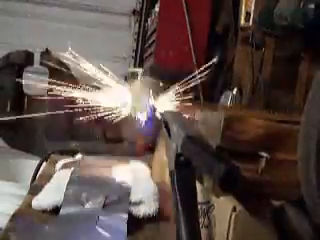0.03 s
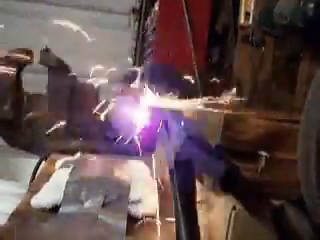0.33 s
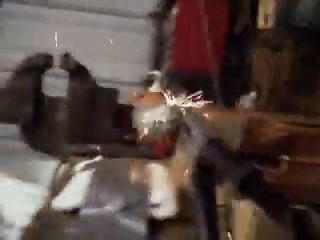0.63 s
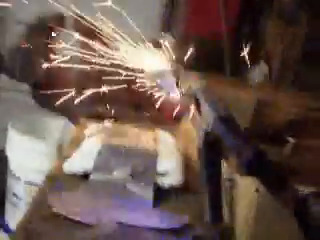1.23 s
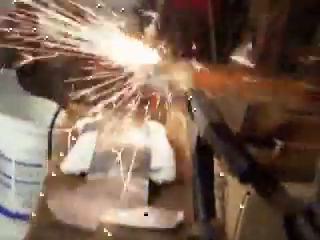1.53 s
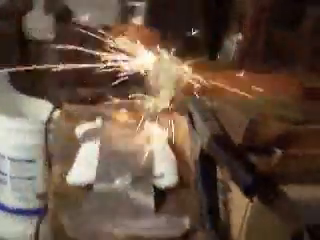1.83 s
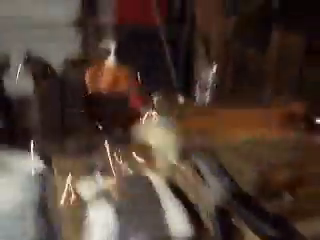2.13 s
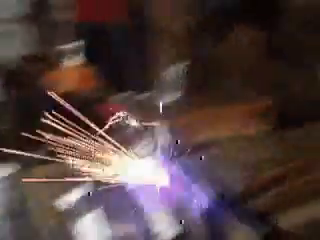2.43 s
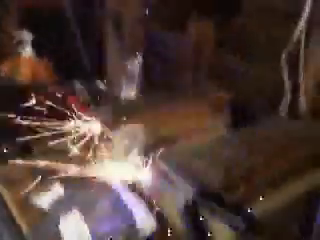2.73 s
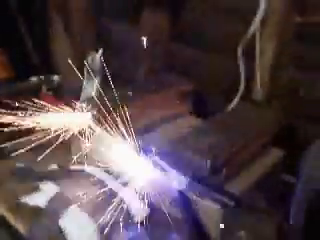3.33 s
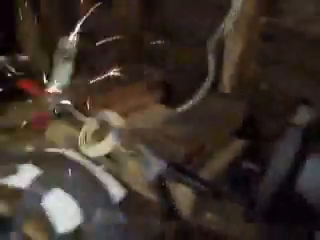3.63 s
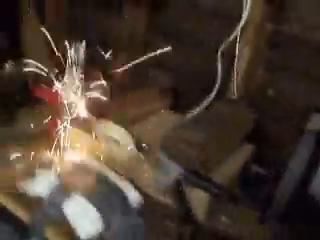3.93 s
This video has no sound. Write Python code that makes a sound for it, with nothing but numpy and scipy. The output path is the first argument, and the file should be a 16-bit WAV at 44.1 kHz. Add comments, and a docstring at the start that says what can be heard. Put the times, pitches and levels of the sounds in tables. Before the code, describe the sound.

Sharp electrical crackling sputters from a sparking motor close to the microphone, each snap ringing briefly in the workshop. Uneven clusters alternate with short lulls, over a soft sizzle, a faint electrical hum and a low rumble.

```python
"""Sputtering motor on a workshop bench

A homemade motor's contacts strike short arcs in irregular runs, each a snap with a few re-strikes
that rings the mount and the room. Molten specks sizzle between them, a few flares puff air at the
microphone, the rotor drones briefly and the supply hums over a low rumble. A small camera hears it
through a narrow band, and its held samples add a thin metallic fizz on top."""
import sys
import numpy as np
from scipy import signal
from scipy.fft import rfft, irfft
from scipy.io import wavfile
from scipy.ndimage import uniform_filter1d

SR = 44100
rng = np.random.default_rng(int(sys.argv[2]) if len(sys.argv) > 2 else 0)


def dump_mix(stems):
    """Bounce the given channels to the path in sys.argv[1] as a 16-bit WAV at rate SR."""
    frames = np.atleast_2d(stems).T  # one column per channel
    limited = np.clip(frames, -1, 1)  # hard clip at full scale
    pcm = np.round(limited * 32767).astype(np.int16)
    wavfile.write(sys.argv[1], SR, pcm)


N = 176400
T = np.arange(N) / SR
BAND_HZ = 2155   # top of the camera's narrow band
LEAD_IN_S = 0.008   # space for the leaders ahead of each snap


def contacts():
    """The motor's contacts strike arcs in irregular runs."""
    # Each row: start in seconds, relative level, bass and treble in dB, span of the re-strikes in ms.
    arcs = [(0.0752, -19.0, -0.5, -0.5, 2.84), (0.0888, -25, -6.0, -0.5, 1.54),
            (0.0979, -22, -3, 2.5, 1.66), (0.112, -20.5, -0.5, -3.5, 1.93), (0.1258, -36, -2, 5.5, 2.1),
            (0.148, -22.5, 6, 1.5, 1.17), (0.1675, -24.5, 2, -1.5, 1.5), (0.184, -29.5, 1.5, -8, 1.22),
            (0.1929, -29.5, 10, -1.5, 0.72), (0.2118, -25, 6, -5, 1), (0.3779, -13.0, -7, -11, 3.15),
            (0.3973, -26.5, -5.5, -5, 3), (0.4125, -25.0, -8.5, -3.5, 4.2), (0.4448, -30, -0.5, -2, 2.17),
            (0.4785, -30.5, 0.0, 1.0, 1.2), (0.498, -26.5, 5.5, 5, 3.2), (0.5159, -32.5, 0.5, 6, 1.5),
            (0.5304, -26.0, 5, -2.5, 1.97), (0.5488, -31.0, 3, -5, 1.28), (0.5683, -31.0, 0.5, -2.5, 1.14),
            (0.6931, -26.5, -1, 3.0, 4.4), (0.7436, -39, 6, 2, 1.7), (0.7633, -29.5, 0.5, -3.5, 1.15),
            (0.7962, -24.0, 1.0, -5, 1.7), (0.8152, -31, 2, 2.0, 2), (0.8498, -31.5, 1.5, -5, 3.6),
            (0.8669, -26.5, 5.5, 2.5, 1.54), (0.9101, -31.5, 2.5, -1.5, 4.8), (0.9249, -36, 1.5, 0, 1.73),
            (0.9328, -25.0, 4.5, 0, 1.16), (0.95, -33.0, 10.5, -6.5, 4.5), (0.9833, -39, -1.0, -1, 2.8),
            (1.0271, -28.5, 0.5, -6, 1.87), (1.0513, -42.5, 1.5, -1, 2.1), (1.1, -33.5, -1.0, 0, 0.65),
            (1.1114, -41.5, 7.5, 4.0, 2.3), (1.132, -37, 11, -11.5, 2.3), (1.1499, -30.5, 3, 0.5, 1.8),
            (1.1633, -25.5, 6, -1.0, 1.53), (1.1809, -28, 1, -2, 2.8), (1.234, -27.0, 5, 2, 2.23),
            (1.2499, -38.5, 6, -3.5, 1.2), (1.392, -36.5, 7, -1, 1.1), (1.412, -29.5, 6, 2.5, 1.6),
            (1.4784, -25.5, 2, 1.5, 1.87), (1.4934, -24, 3.5, 8, 2.33), (1.497, -24, 5, 8.5, 0.82),
            (1.5376, -36.0, 5.5, 2, 1.06), (1.5453, -23.0, 2.0, 3, 0.8), (1.5816, -33.0, -2.5, 9, 1.5),
            (1.6171, -39, -7.5, 3.5, 2.6), (1.786, -39.5, -0.5, 2, 1.7), (1.7985, -28.5, -2.0, 2.5, 1.76),
            (1.8077, -37, -3, 1, 6), (1.8359, -34.5, -0.5, 7, 1.28), (1.912, -31.5, -3.5, 5, 1.15),
            (1.9342, -40, -7, 3, 2.1), (1.9775, -43.0, 0.0, 3.5, 2.9), (1.9927, -44.5, 2, 1.5, 3.36),
            (2.009, -43.5, -4, -0.5, 2.33), (2.2764, -32.5, -7, -4, 1.38), (2.316, -43.5, 0.0, 3, 2.4),
            (2.3307, -33.5, -12.5, 1.5, 2.6), (2.3582, -41.5, 0.5, -3, 3.44),
            (2.3644, -31.5, -9, -1.5, 0.99), (2.453, -42, 3.5, 7, 2.4), (2.4643, -31.0, 2.0, -5.0, 1.6),
            (2.5673, -25.5, 2, -0.5, 1.77), (2.579, -24.5, -4.5, -3.5, 1.3), (2.6127, -32.5, 0, 2.5, 2.1),
            (2.6303, -27.0, -2.5, 0, 1.67), (2.682, -36, -2, 0, 2.8), (2.71, -34.5, -3, -3.5, 1.37),
            (2.7283, -30.5, 3, 4, 1.77), (2.7679, -38.5, 10, 1, 3.14), (3.0452, -22.5, -3, 2, 4.35),
            (3.0615, -41.5, 0, 6.5, 2.6), (3.1126, -37.5, -12.5, -2, 2.2), (3.1632, -36.0, -13, -1.0, 4),
            (3.2099, -35.5, -1.5, 2.5, 2.06), (3.2698, -39, 6.5, 6, 3.2), (3.2809, -19.5, -3, -2.5, 2.76),
            (3.3436, -32.5, -1, -5.5, 3.93), (3.3513, -33.5, -3, -4, 4.3), (3.4095, -36.5, -7.5, 8, 2.6),
            (3.5149, -21.5, -5.5, -4, 3.4), (3.5307, -28.5, -6, -8, 2.02), (3.5667, -32.5, -10, -4.5, 4.4),
            (3.6146, -32.5, -1.5, 2.5, 2.75), (3.632, -33.0, -3, 2, 3.95), (3.7675, -35, 1.5, -5.5, 4.75),
            (3.7753, -39, -4, -2, 5.1), (3.7841, -40, -3, -1, 2.5), (3.8443, -25, -4.5, 2.5, 1.97),
            (3.8673, -35.0, 7.5, -0.5, 3.4), (3.8801, -32.0, 3, 3.5, 2)]
    out = np.zeros(N)
    for start, *shape in arcs:
        add(out, start - LEAD_IN_S, arc(*shape))
    return out


def arc(db, bass_db, treble_db, length_ms, size=4096):
    """The gap spits leaders, for longer in a long arc, then breaks down with a snap and re-strikes."""
    # Each row: frequency in Hz, relative level of the snap there in dB.
    spectrum = [(40, -22), (110, -17), (200, -5), (310, -4.5), (480, -5), (700, -2), (1000, -1), (1300, 1),
                (1650, 4.5), (2100, -5)]
    hz, length_s = freqs(size), length_ms / 1000
    clicks = signal.unit_impulse(size, int(LEAD_IN_S * SR))
    clicks += strikes(size, span_s=-0.0008 - 0.6 * length_s, db=-10.5, count=2)   # leaders
    clicks += strikes(size, span_s=length_s, db=-3, count=4)   # re-strikes
    tone_db = at_hz([(410, bass_db), (1030, 0), (1620, treble_db)], hz)
    snap = colour(evened(clicks), at_hz(spectrum, hz) + tone_db)
    snap *= np.sqrt(0.005 * SR / band_energy(snap))   # the energy of 5 ms at rms 1
    return from_db(db - 0.5) * bench(snap)


def strikes(size, span_s, db, count):
    """Small discharges of either sign, strewn after the snap, or before it if the span is negative."""
    when = LEAD_IN_S + span_s * (np.arange(count) + rng.uniform(0.3, 1, count)) / count
    heights = from_db(db) * rng.uniform(0.42, 1, count) * rng.choice([-1, 1], count)
    out = np.zeros(size)
    np.add.at(out, np.maximum(when * SR, 0).astype(int), heights)
    return out


def bench(snap, echo_s=0.003058, echo_db=-15, scatter_db=-8):
    """The direct snap, one clear reflection off the bench top, and scatter off vice, bench and tools."""
    echo = np.roll(snap, int(echo_s * SR))
    tail = evened(dying_noise(t60_s=0.059, delay_s=0.0021, size=len(snap)))
    scatter = signal.fftconvolve(snap, tail)[:len(snap)]
    return snap + from_db(echo_db) * echo + from_db(scatter_db) * scatter


def mount(arcs):
    """The motor and its mount ring briefly with every arc."""
    # Each row: resonance in Hz, gain in dB, seconds to die away by 60 dB.
    modes = [(314, -4, 0.16), (482, -2.5, 0.11), (655, -9, 0.17), (994, -6.5, 0.15), (1311, -8, 0.074),
             (1624, -14.5, 0.062)]
    out = np.zeros(N)
    for hz, db, t60_s in modes:
        radius = from_db(-60 / (t60_s * SR))
        feedforward = np.array([1, 0, -1]) * (1 - radius ** 2) / 2
        feedback = [1, -2 * radius * np.cos(2 * np.pi * hz / SR), radius ** 2]
        out += from_db(db) * signal.lfilter(feedforward, feedback, arcs + 1e-18)
    return out


def puffs(hz=45.3, t60_s=0.0066):
    """Air heated by a flare expands and gives the microphone a low, heavily damped push."""
    # Each row: start in seconds, peak in dB.
    flares = [(0.376, -45), (0.798, -42), (0.9322, -25), (3.2810, -14.5)]
    out, t = np.zeros(N), T[:SR // 10]
    for start, db in flares:
        add(out, start, from_db(db - 60 * t / t60_s) * np.cos(2 * np.pi * hz * t))
    return out


def sizzle(specks_per_s=1200, spread_db=1, sputter_db=1):
    """Molten specks crackle at random, in quick uneven spurts."""
    # Each row: time in seconds, relative level in dB.
    levels = [(0.0, -45.5), (0.13, -50.5), (0.26, -40), (0.68, -39), (1.05, -47), (1.21, -46),
              (1.41, -47.5), (1.55, -52.5), (1.85, -50), (2.0, -59), (2.21, -50.5), (2.54, -53.5),
              (2.87, -57.5), (3.09, -63), (3.23, -52.5), (3.45, -44.5), (3.91, -50), (4.0, -57)]
    # Each row: frequency in Hz, relative level in dB.
    spectrum = [(60, -1), (250, -5), (600, -2.5), (1000, -1), (1450, 2.5), (2100, -9)]
    sizes = from_db(spread_db * np.minimum(rng.exponential(1, N), 5))
    signs = rng.choice([-1, 1], N)
    specks = sizes * signs * (rng.random(N) < specks_per_s / SR)
    level = from_db(in_time(levels) - 5 + sputter_db * waver(count=400))
    return level * steady(specks, spectrum)


def rotor(waver_hz=6, waver_db=4, octave_db=-3.5):
    """The coasting rotor gives a faint, unsteady drone with its octave."""
    # Each row: time in seconds, pitch in Hz, level in dB.
    drone = [(1.901, 114, -80), (2.02, 134, -65), (2.101, 155.1, -62), (2.3, 157.4, -64.5),
             (2.43, 155, -63), (2.55, 143, -61), (2.699, 142, -85)]
    times, hz, db = np.transpose(drone)
    pitch = np.interp(T, times, hz) + waver_hz * waver()
    phase = 2 * np.pi * np.cumsum(pitch) / SR
    coasting = (T > times[0]) & (T < times[-1])
    level = from_db(np.interp(T, times, db) + waver_db * waver()) * coasting
    return np.sqrt(2) * level * (np.sin(phase) + from_db(octave_db) * np.sin(2 * phase))


def workshop(arcs, db=-8.5):
    """The arcs come back to the microphone as the diffuse ring of the room."""
    # Each row: frequency in Hz, relative gain of the room in dB.
    spectrum = [(60, -2), (150, -2), (280, 0.5), (550, -2), (1000, -1), (1500, -3), (2100, -9.5)]
    echoes = dying_noise(t60_s=0.62, delay_s=0.0047, size=SR)
    tail = colour(echoes, at_hz(spectrum, freqs(SR)))
    return from_db(db) * signal.fftconvolve(arcs, tail)[:N]


def supply_hum(hz=59.6, rms_db=-67, third_db=-66, waver_db=3):
    """The mains supply hums; its third harmonic swells with the current drawn."""
    # Each row: time in seconds, lift of the third harmonic in dB.
    load = [(0, 21), (.07, 23), (.2, 5.5), (.6, 10), (1.3, -1), (2.1, -1), (3.1, -1), (4, -6.5)]
    phase = 2 * np.pi * (hz * T + rng.random())
    fundamental = from_db(rms_db + waver_db * waver()) * np.sin(phase)
    third = from_db(third_db + in_time(load) + waver_db * waver()) * np.sin(3 * phase)
    return np.sqrt(2) * (fundamental + third)


def rumble():
    """A low rumble lies under everything, strongest at the start."""
    # Each row: time in seconds, relative level in dB.
    levels = [(0.0, -48.5), (0.78, -56.5), (1.08, -55.5), (1.66, -67.5), (2.53, -60), (2.75, -65),
              (3.56, -65.5), (4.0, -59.5)]
    # Each row: frequency in Hz, relative level in dB.
    spectrum = [(15, -13), (28, 0), (42, 0), (75, -5), (160, -4.5), (320, -13), (700, -25.5), (2000, -15.5)]
    return from_db(in_time(levels) + 3) * steady(rng.standard_normal(N), spectrum)


def from_db(db):
    """Decibels to gain."""
    return 10 ** (np.asarray(db) / 20)


def at_hz(points, hz):
    """Read a spectrum on a log-frequency axis."""
    f, db = np.transpose(points)
    return np.interp(np.log(hz + 1), np.log(f), db)


def in_time(rows):
    """Read a curve at every sample."""
    return np.interp(T, *np.transpose(rows))


def freqs(size):
    """Frequencies of a spectrum of this many samples."""
    return np.arange(size // 2 + 1) * SR / size


def colour(x, db):
    """Causal (minimum-phase) filter with the given gain at each frequency."""
    cepstrum = irfft(np.log(from_db(db)))
    cepstrum[1:len(x) // 2] *= 2
    cepstrum[len(x) // 2 + 1:] = 0
    return irfft(rfft(x) * np.exp(rfft(cepstrum)))


def evened(x, bins=37):
    """Flatten the broad humps of a spectrum and keep its fine structure."""
    smooth_power = uniform_filter1d(np.abs(rfft(x)) ** 2, bins)
    return colour(x, -10 * np.log10(smooth_power + 1e-9))


def band_energy(x):
    """Energy inside the camera's band."""
    in_band = rfft(x)[freqs(len(x)) < BAND_HZ]
    return 2 * np.sum(np.abs(in_band) ** 2) / len(x) + 1e-20


def steady(x, spectrum):
    """Colour a long signal and bring it to rms 1 in the band."""
    x = colour(x, at_hz(spectrum, freqs(N)))
    return x * np.sqrt(N / band_energy(x))


def dying_noise(t60_s, delay_s, size):
    """Dense echoes that are fully in by the delay and die away; energy 1."""
    t = np.arange(size) / SR
    onset = np.clip(2 * t / delay_s - 1, 0, 1)
    x = rng.standard_normal(size) * from_db(-60 * t / t60_s) * onset
    return x / np.sqrt(np.sum(x ** 2))


def waver(count=80):
    """A random drift through this many points, with a spread of about 1."""
    return np.interp(T, np.linspace(0, T[-1], count), rng.standard_normal(count))


def add(out, start_s, x):
    """Mix a sound in at a time."""
    i = int(start_s * SR)
    out[i:i + len(x)] += x[:max(N - i, 0)]


def scene():
    """The motor, the room and the background as they reach one microphone."""
    arcs = contacts()
    ringing_arcs = arcs + mount(arcs) + workshop(arcs)
    return (ringing_arcs + puffs() + sizzle() + rotor() + rumble() + supply_hum())[None]


def record(dry):
    """The camera samples a narrow band coarsely and holds each value, mirroring it into the treble."""
    edge_hz, leak_db, hold_samples, cutoff_hz = 460, -36, 4, 12900
    band = signal.firwin(int(4 * SR / edge_hz) | 1, BAND_HZ, fs=SR)
    leak = signal.lfilter(*signal.butter(2, BAND_HZ, fs=SR), dry[0])   # reaches just above the band
    narrow = signal.fftconvolve(dry[0], band, "same") + from_db(leak_db) * leak
    held = np.repeat(narrow[::hold_samples], hold_samples)[:N]
    add(held, 0.3963, from_db([-15.5]))   # one thin, bright tick after the loudest arc
    top_cut = signal.firwin(301, cutoff_hz, fs=SR)
    return signal.fftconvolve(held, top_cut, "same")[None]


dry = scene()
out = record(dry)
dump_mix(out)
```